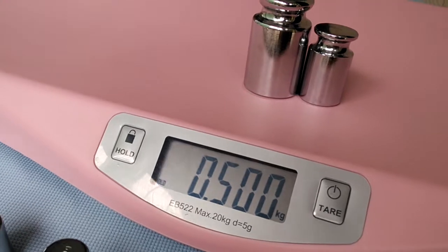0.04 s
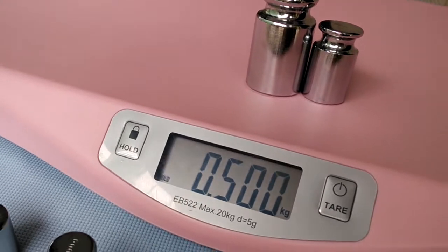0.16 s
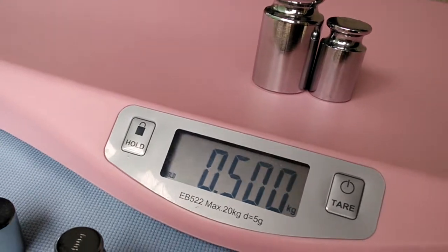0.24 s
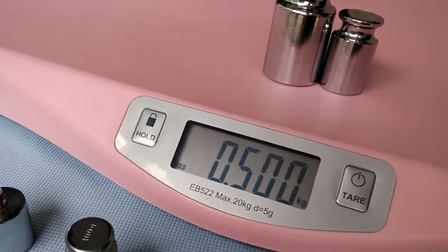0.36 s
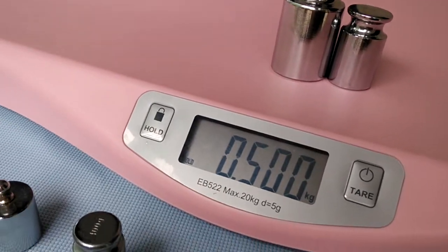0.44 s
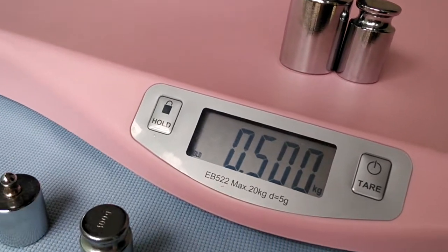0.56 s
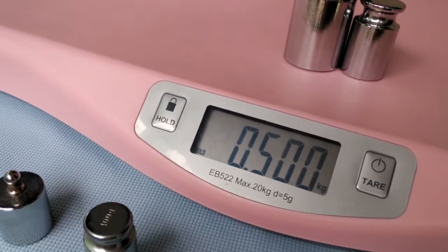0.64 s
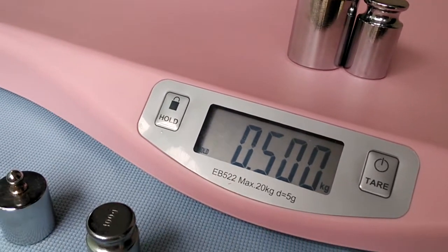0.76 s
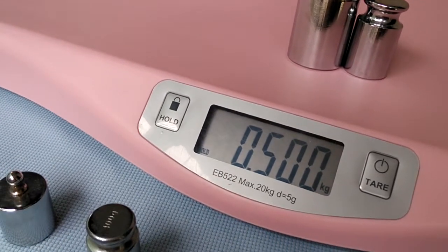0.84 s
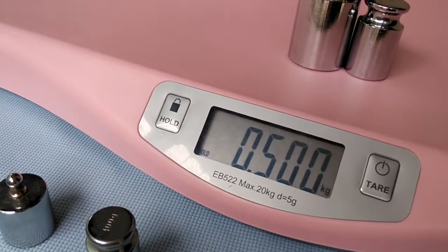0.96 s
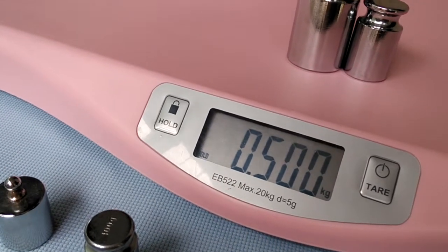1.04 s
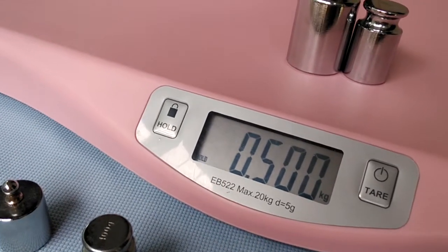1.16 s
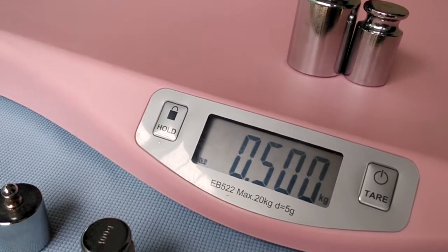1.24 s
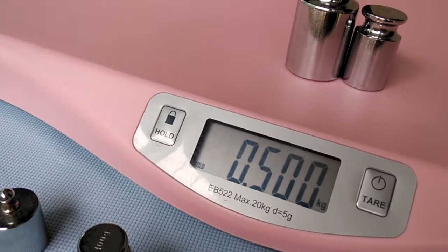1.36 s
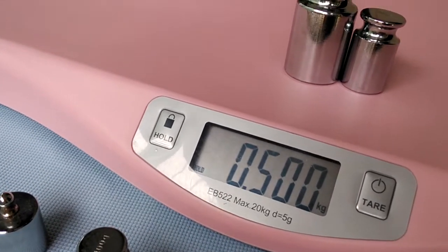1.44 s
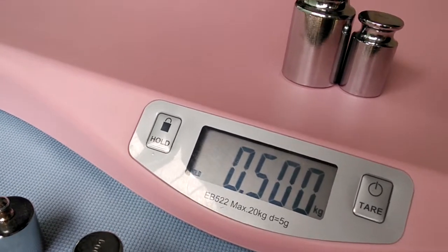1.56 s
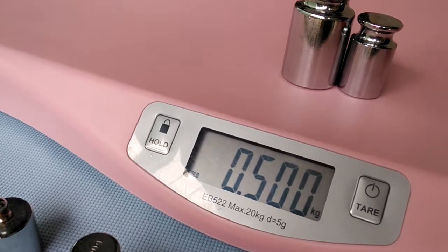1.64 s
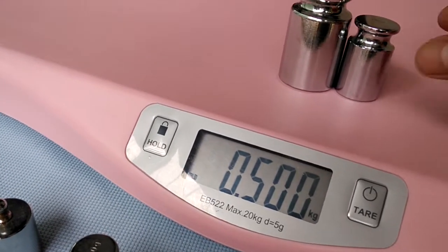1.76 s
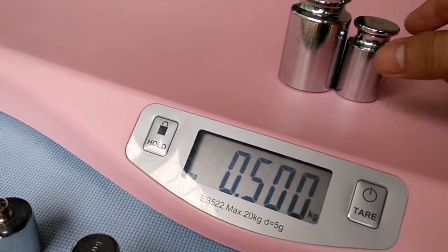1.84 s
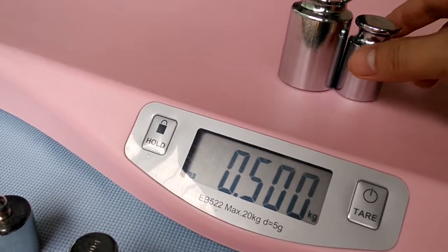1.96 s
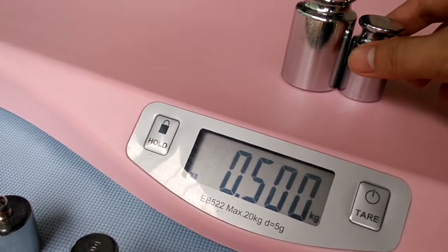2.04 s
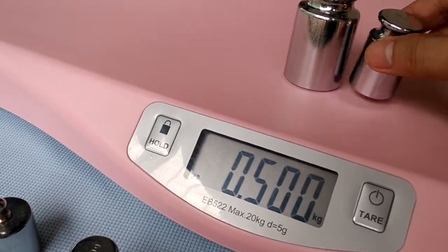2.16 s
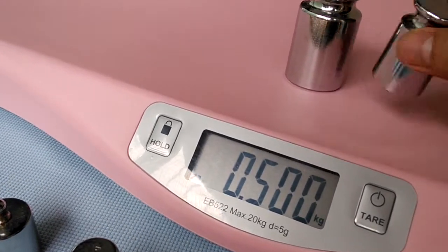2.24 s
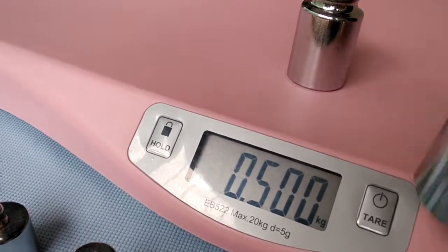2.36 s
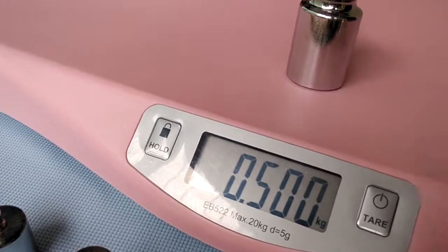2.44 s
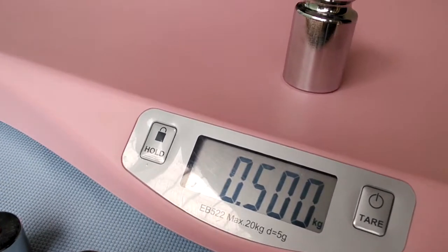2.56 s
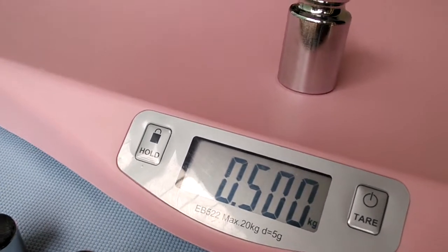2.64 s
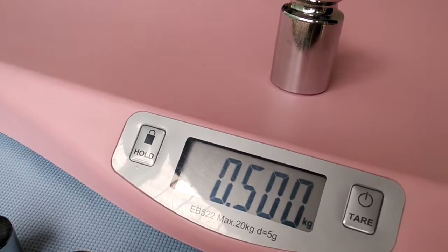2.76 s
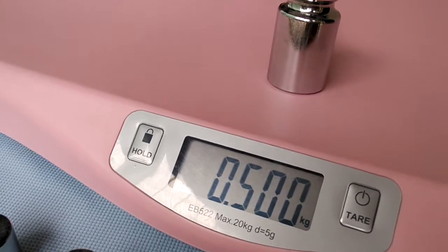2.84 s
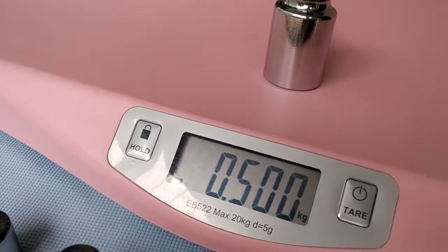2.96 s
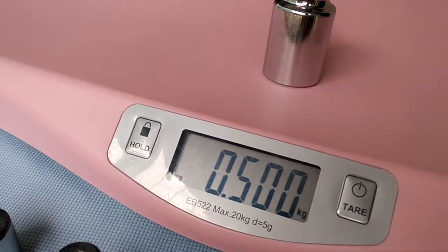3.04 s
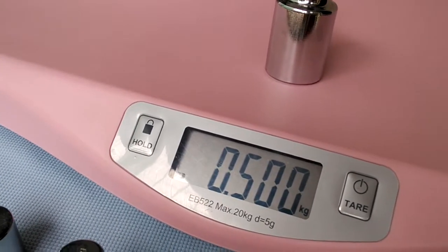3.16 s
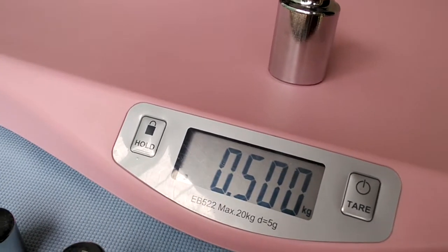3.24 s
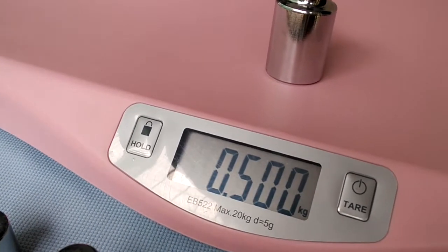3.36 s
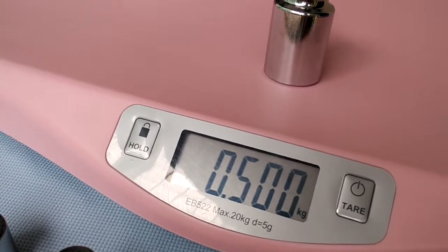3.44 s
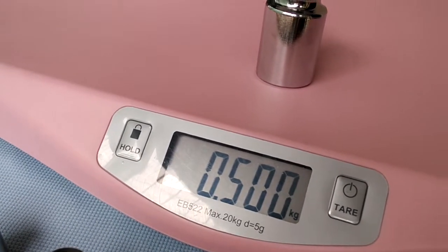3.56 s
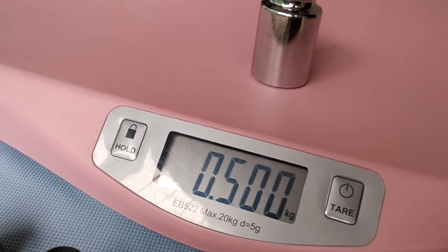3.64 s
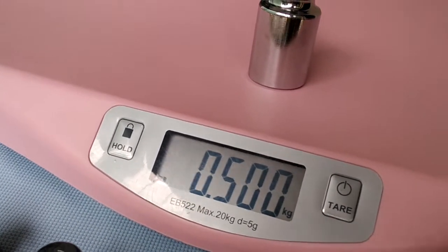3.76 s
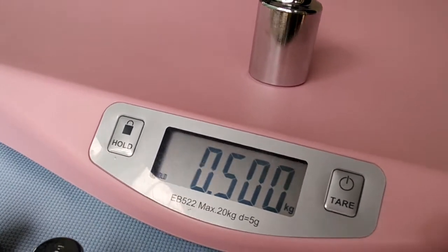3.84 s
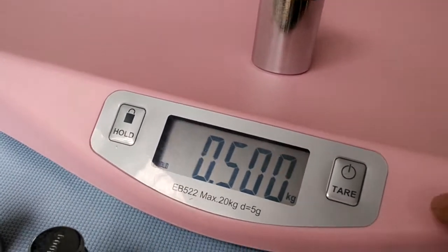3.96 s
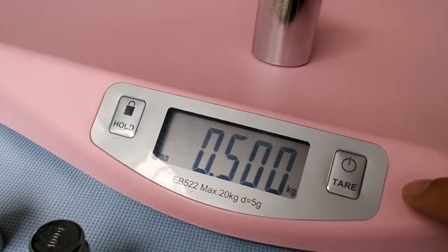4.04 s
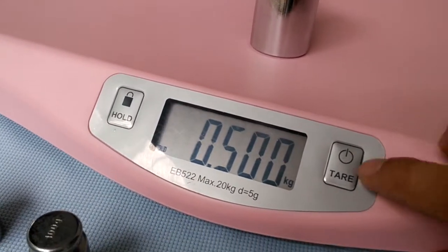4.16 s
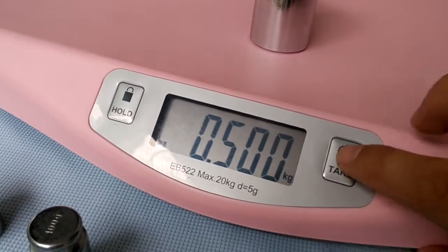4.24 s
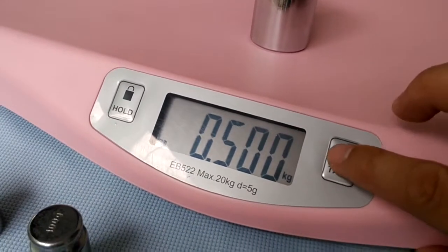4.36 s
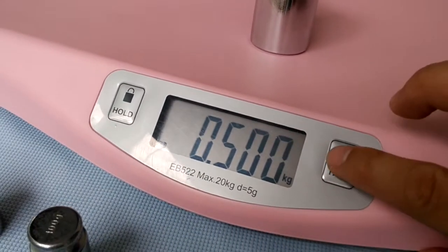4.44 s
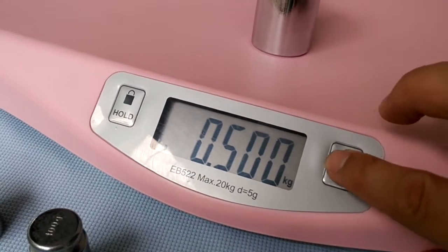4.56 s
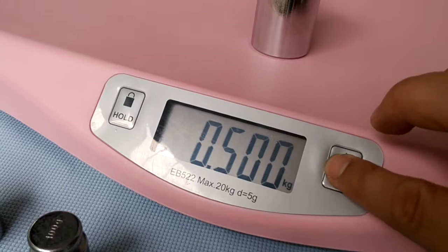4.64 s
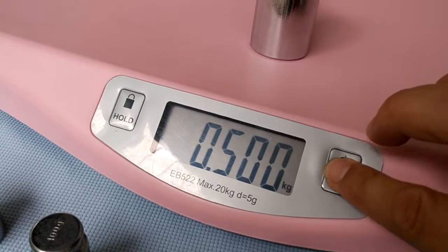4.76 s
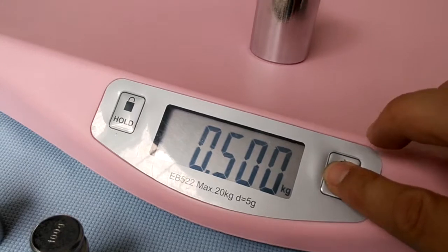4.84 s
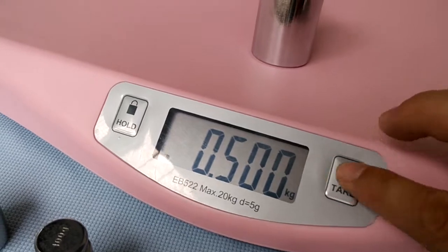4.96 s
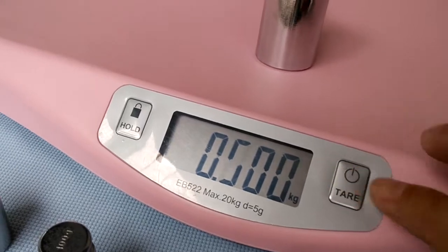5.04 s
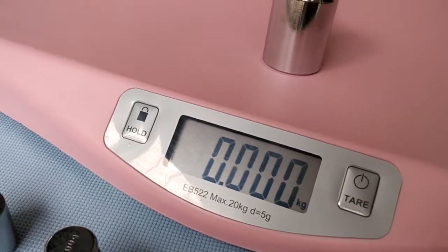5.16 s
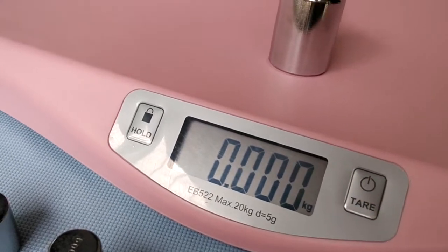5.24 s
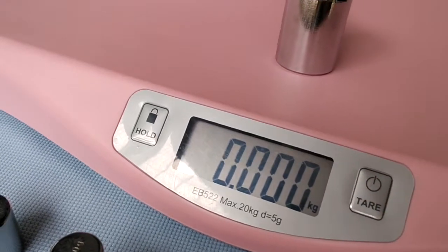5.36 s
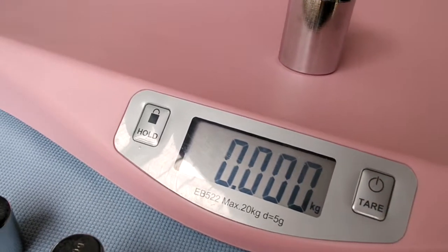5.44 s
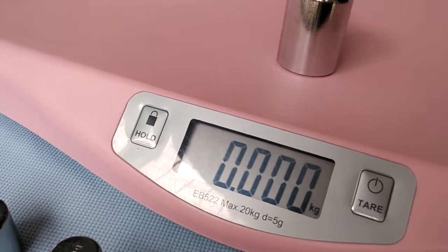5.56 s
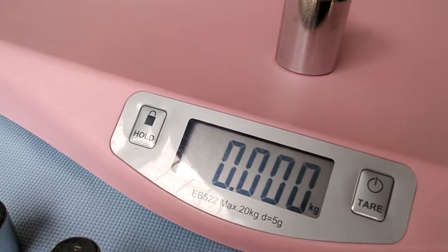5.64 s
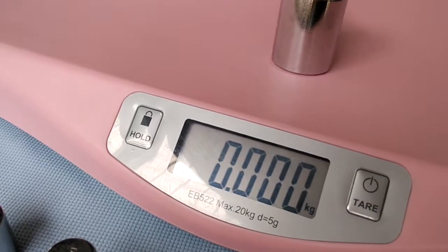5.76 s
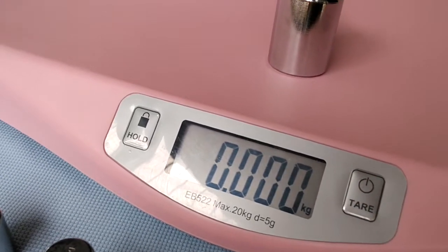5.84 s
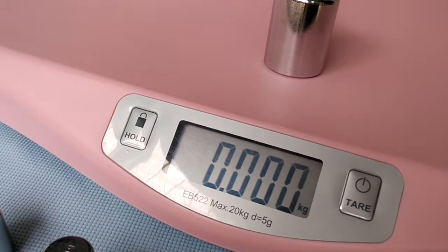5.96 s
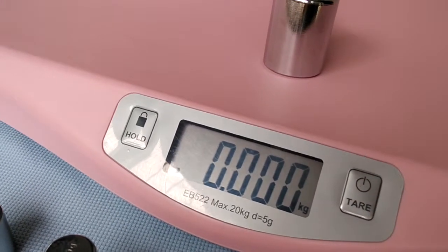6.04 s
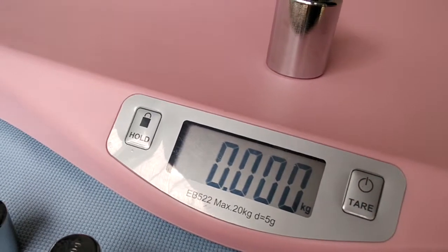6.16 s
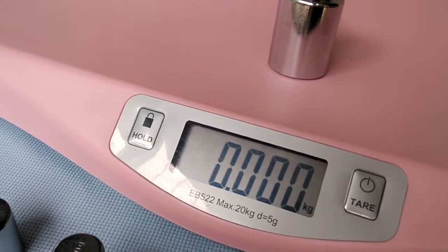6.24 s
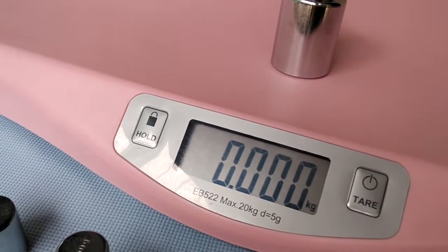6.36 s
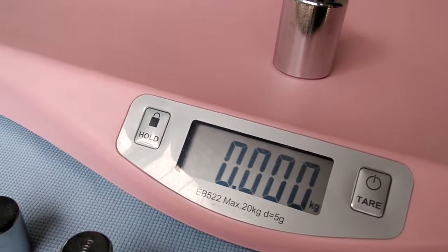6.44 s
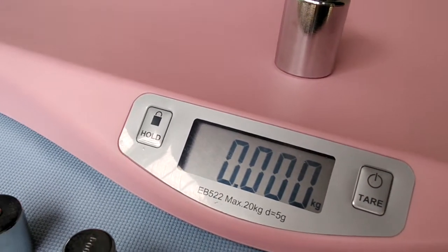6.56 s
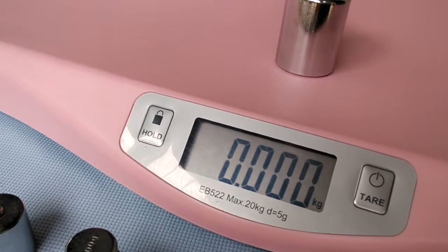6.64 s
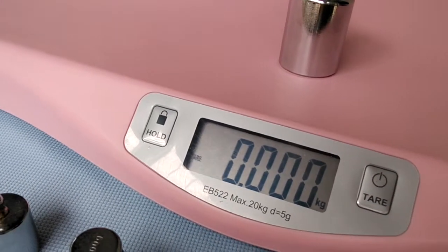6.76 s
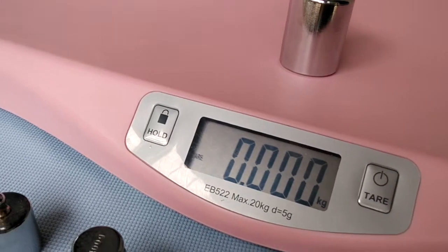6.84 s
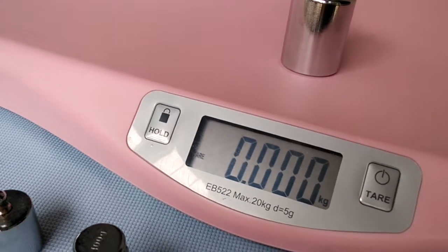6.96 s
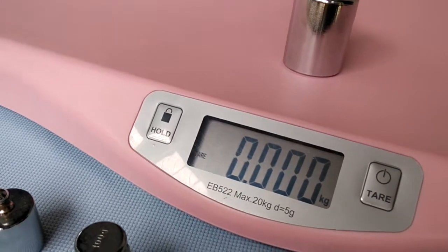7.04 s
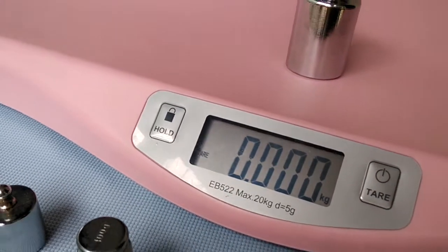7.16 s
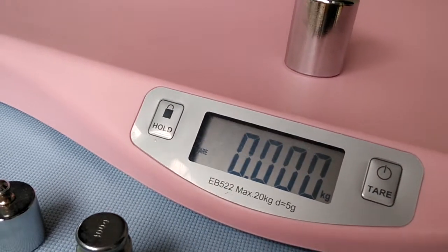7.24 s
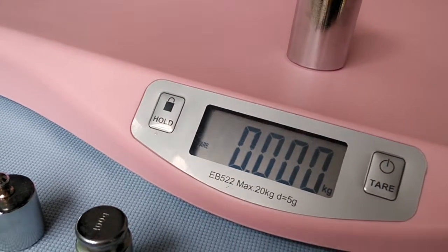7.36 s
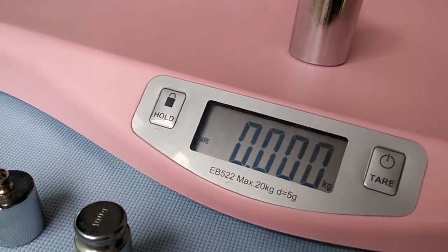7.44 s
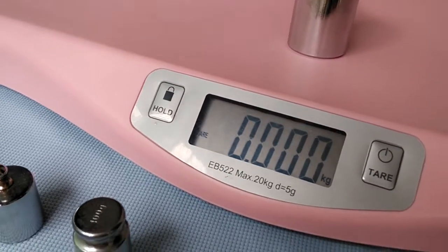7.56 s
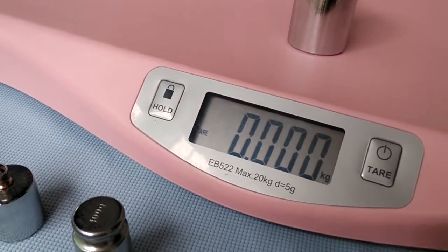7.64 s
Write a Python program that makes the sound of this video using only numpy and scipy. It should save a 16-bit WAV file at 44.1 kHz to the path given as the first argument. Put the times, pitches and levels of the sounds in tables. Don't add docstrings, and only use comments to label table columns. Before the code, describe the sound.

A faint weight lift and dull table knock, then a sharp plastic button click and softer release, over quiet birdsong and distant traffic.

```python
import sys
import numpy as np
from scipy import signal
from scipy.fft import irfft
from scipy.io import wavfile
from scipy.ndimage import uniform_filter1d

SR = 44100
rng = np.random.default_rng(int(sys.argv[2]) if len(sys.argv) > 2 else 0)


def waveform_to_disk(signal):
    frames = np.transpose(np.atleast_2d(signal))
    scaled = np.clip(frames, -1, 1) * 32767
    samples = np.round(scaled).astype(np.int16)
    wavfile.write(sys.argv[1], SR, samples)


def field_ratio(decibels):
    return 10 ** (np.asarray(decibels, dtype=float) / 20)


N = 339173


def evened(x):
    return x / np.sqrt(np.mean(x ** 2) + 1e-20)


def read(points, hz):
    f, value = np.transpose(points)
    return np.interp(np.log(hz + 1), np.log(f + 1), value)


def columns(rows, t):
    s, *values = np.transpose(rows)
    return [np.interp(t, s, v) for v in values]


def add(mix, s, sound):
    at = round(s * SR)
    part = mix[max(at, 0):][:len(sound) + min(at, 0)]
    part += sound[max(-at, 0):][:len(part)]


def resonate(x, hz, width_hz):
    turn = np.exp(2j * np.pi * np.cumsum(hz * np.ones(len(x))) / SR)
    r = np.exp(-np.pi * width_hz / SR)
    return 2 * (turn * signal.lfilter([1 - r], [1, -r], x / turn)).real


def ring(modes, contact_s):
    t = np.arange(SR // 3) / SR
    bell = sum(field_ratio(db - 60 * t / t60) * np.sin(2 * np.pi * hz * t) for hz, db, t60 in modes)
    push = np.sin(np.pi * np.clip(t[:400] / contact_s, 0, 1))
    out = np.convolve(bell, push)
    return out / abs(out).max()


def tail(decays, gap_s):
    hz, t, z = signal.stft(rng.standard_normal(SR), SR, nperseg=128)
    out = signal.istft(z * field_ratio(-60 * t / read(decays, hz)[:, None]), SR, nperseg=128)[1][:SR]
    out = np.concatenate([np.zeros(round(gap_s * SR)), out])
    return out / np.linalg.norm(out)


def coloured(points, size):
    gain = field_ratio(read(points, np.fft.rfftfreq(size, 1 / SR)))
    out = np.roll(irfft(gain), size // 2) * np.hanning(size)
    return out / np.linalg.norm(out)


def wash(points, size, patchy_db, flicker_db):
    frames, hz = 4 * N // size + 5, np.fft.rfftfreq(size, 1 / SR)
    a, b, patches = rng.standard_normal((frames, len(hz), 3)).T
    patches = evened(uniform_filter1d(uniform_filter1d(patches, 20, axis=0), 6, axis=1))
    flicker = evened(uniform_filter1d(rng.standard_normal(frames), 3))
    level_db = read(points, hz)[:, None] + patchy_db * patches + flicker_db * flicker
    z = (a + 1j * b) * field_ratio(level_db)
    return evened(signal.istft(z, nperseg=size, noverlap=3 * size // 4)[1][:N])


# (closest time [s], distance over speed [s], rumble level [dB], tyre hiss level [dB])
PASSES = [(.05, 0.16, -61.5, -81), (2.5, 0.28, -59, -100), (3.25, 0.25, -73.5, -89), (3.9, .3, -60, -80),
          (4.75, 0.37, -66, -80), (5.95, 0.07, -62, -95), (6.3, 0.57, -63.5, -74)]


def traffic(steady_db, axis):
    t = np.arange(N) / SR
    power = field_ratio(steady_db) ** 2
    for row in PASSES:
        power = power + field_ratio(row[axis]) ** 2 / (1 + ((t - row[0]) / row[1]) ** 2)
    return np.sqrt(power)


# (frequency [Hz], density [dB per Hz])
STREET = [(8.8, -31.5), (15, -10), (32, 0), (49, -2), (97, -16.5), (157, -10.5), (198, -20), (231, -16.5),
          (327, -19.5), (421, -21.5), (463, -24.5), (561, -22.5), (618, -27.5), (750, -28), (1500, -46),
          (1950, -60), (3300, -120)]


def rumble():
    return field_ratio(2.5) * traffic(-58.5, axis=2) * wash(STREET, size=4096, patchy_db=1.33, flicker_db=1.17)


def tyres():
    hiss = resonate(resonate(rng.standard_normal(N), 2250, 780), 2300, 900)
    return field_ratio(-2.0) * traffic(-87, axis=3) * evened(hiss)


# (frequency [Hz], density [dB per Hz])
AIR = [(530, -33), (900, -0.5), (1410, -8), (2490, -13.5), (3130, -14.5), (4280, -16), (4580, -16),
       (6190, -16.5), (8950, -5.5), (9700, -5), (10900, -4), (12500, -15), (14200, -9)]
# (time [s], rise [dB])
GUSTS = [(0, 1.5), (1.3, 1.5), (2.6, 2), (3.5, 0), (4.6, 1.5), (6.1, 0.5), (7.05, 0), (7.65, 0.5)]


def air():
    t, gust_s = np.arange(N) / SR, 0.19
    gust_db = sum(db * np.exp(-((t - s) / gust_s) ** 2) for s, db in GUSTS)
    return field_ratio(-70 + gust_db + 4.0) * wash(AIR, size=1024, patchy_db=2.0, flicker_db=1.0)


def whine():
    hz, level_db = 9586, -77
    return field_ratio(level_db) * evened(resonate(resonate(rng.standard_normal(N), hz, 200), hz, 280))


# (middle [s], length [s], frequency [Hz], level [dB])
METAL = [(.07, .08, 3308, -79), (.22, .15, 3308, -76), (.335, .1, 3308, -79), (.45, .12, 3308, -80),
         (.57, .07, 3308, -85), (.68, .14, 3308, -87), (.9, .18, 3308, -87), (.06, .12, 2945, -77),
         (.14, .06, 2945, -79), (.21, .13, 2945, -77), (.34, .06, 2945, -82), (.55, .4, 2945, -88),
         (.19, .26, 697, -75)]


def metal():
    out, wander_hz = np.zeros(N), 18
    t = np.arange(N) / SR
    wander = np.cumsum(wander_hz * evened(resonate(rng.standard_normal(N), 25, 30))) / SR
    t, wander = t[:2 * SR], wander[:2 * SR]
    for s, length, hz, db in METAL:
        swell = np.cos(np.pi * np.clip((t - s) / length, -.5, .5))
        add(out, 0, np.sqrt(2) * field_ratio(db) * swell * np.sin(2 * np.pi * (hz * t + wander)))
    return out


def insect():
    t = np.arange(N) / SR
    base_hz, climb_hz, climb_s = 4540, 100, 0.87
    base_db, near_db, near_s, fade_db_per_s, pulse_db = -84.5, 5.5, 0.86, 4, 3
    hz = base_hz + climb_hz * np.tanh((t / climb_s) ** 2)
    db = base_db + near_db * np.exp(-(t / near_s) ** 2) - fade_db_per_s * t
    db += pulse_db * evened(resonate(rng.standard_normal(N), 6.5, 6))
    return field_ratio(db) * evened(resonate(resonate(rng.standard_normal(N), hz, 120), hz, 200))


def whistles(calls, lower_db, trill_hz, depth, fade_db, yard_db, yard_t60, hoarse_hz):
    out = np.zeros(N + SR)
    wobble = evened(uniform_filter1d(rng.standard_normal(N + SR), 900))
    for rows in calls:
        t = np.arange(rows[0][0], rows[-1][0], 1 / SR)
        hz, db = columns(rows, t)
        hoarse = evened(uniform_filter1d(rng.standard_normal(SR), 200))[:len(t)]
        shake = wobble[round(t[0] * SR) + SR:][:len(t)]
        trill = np.cumsum(trill_hz * (1 + .25 * shake)) / SR
        dip = abs(np.sin(np.pi * trill)) ** 7
        dip = dip * rng.uniform(.35, 1, 99)[trill.astype(int) % 99]
        sung_hz = uniform_filter1d(hz - depth * (hz - hz.min()) * dip + hoarse_hz * hoarse, 60)
        tone = field_ratio(-fade_db * dip) * np.sin(2 * np.pi * np.cumsum(sung_hz) / SR)
        tone += field_ratio(lower_db + 2.7 * shake) * np.sin(np.pi * np.cumsum(hz) / SR)
        add(out, t[0] + 1, np.sqrt(2) * field_ratio(db) * tone * signal.windows.tukey(len(t), .1))
    yard = tail([(3000, yard_t60), (9000, 2.05 * yard_t60)], .004)
    return (field_ratio(-yard_db) * out + signal.fftconvolve(out, yard)[:len(out)])[SR:]


# (start [s], length [s], pitch [Hz], level [dB])
NOTES = [(-.12, .07, 6900, -65), (-.05, 0.13, 7700, -57.5), (0.103, 0.048, 8040, -59.5),
         (1.165, 0.032, 6500, -69.5), (1.2, 0.049, 7200, -66.5), (1.251, 0.047, 7740, -61.5),
         (1.303, 0.085, 7750, -60), (1.39, 0.098, 7590, -65), (1.498, 0.08, 7450, -66.5),
         (3.453, .05, 7130, -67.5), (3.494, 0.18, 7600, -63.5), (3.582, .07, 6560, -75),
         (3.66, 0.18, 7990, -62.5), (4.287, 0.039, 6260, -72), (4.326, .115, 7030, -64.5),
         (4.45, 0.12, 7680, -63), (4.565, 0.16, 8200, -68), (7.313, 0.094, 6720, -69),
         (7.4, 0.16, 7620, -64), (7.5, .19, 8050, -66)]


def ladder_bird():
    scoop_hz, scoop_s, scoop_db = 6150, .005, -10
    drift_hz, sag_db_per_s = 55, 32
    calls = [[(s, min(scoop_hz, hz), db + scoop_db),
              (s + scoop_s, hz - drift_hz, db),
              (s + length, hz + drift_hz, db - sag_db_per_s * length)] for s, length, hz, db in NOTES]
    return whistles(calls, lower_db=-25.5, trill_hz=40, depth=.95, fade_db=14,
                    yard_db=1, yard_t60=0.45, hoarse_hz=80)


# (time after start [s], pitch [Hz], relative level [dB])
SWOOP = [(0, 7350, 1), (.02, 6510, -4.5), (.052, 4610, -13), (.088, 4820, -13), (.127, 5640, -5),
         (.168, 5040, -14), (.208, 4370, -8.5), (.238, 4245, -34)]
# (start [s], level [dB])
SWOOPS = [(2.45, -52.5), (6.125, -51.5)]


def swooping_bird():
    calls = [np.add(SWOOP, (s, 0, db)) for s, db in SWOOPS]
    return whistles(calls, lower_db=-46, trill_hz=45, depth=0.33, fade_db=7,
                    yard_db=6.7, yard_t60=0.48, hoarse_hz=80)


def glides(rows):
    u, swell_db = np.linspace(0, 1, num=8), 9.5
    calls = []
    for s, length, from_hz, to_hz, db in rows:
        hz = from_hz + (to_hz - from_hz) * np.sin(np.pi * u / 2)
        calls.append(np.transpose([s + length * u, hz, db - swell_db * (1 - u) ** 2]))
    return calls


# (start [s], length
# [s], from [Hz], to [Hz], level [dB])
GLIDES = [(3.47, .1, 3600, 3800, -86), (3.993, .175, 5340, 6740, -80.5), (4.24, .07, 6600, 6000, -83),
          (4.28, 0.067, 8100, 8450, -76), (4.34, .06, 8450, 8050, -81)]
# (start [s], length [s], from [Hz], to [Hz], level [dB])
STUTTER = [(7.31, .06, 4850, 5000, -80), (7.36, 0.065, 5100, 5220, -74), (7.42, 0.081, 5350, 5650, -75)]


def far_birds():
    thin = whistles(glides(GLIDES), lower_db=-46, trill_hz=40, depth=.04, fade_db=4.3,
                    yard_db=-2.0, yard_t60=.25, hoarse_hz=20)
    broken = whistles(glides(STUTTER), lower_db=-48, trill_hz=60, depth=.5, fade_db=12,
                      yard_db=8, yard_t60=.2, hoarse_hz=170)
    return thin + broken


# (frequency [Hz], t60 [s])
ROOM = [(250, 0.26), (660, 0.19), (1740, 0.11), (4590, 0.14), (12100, 0.17)]


def room(gap_s):
    return tail(ROOM, gap_s)


# (time [s], level [dB], contact [s])
KNOCKS = [
    (2.679, -25, 0.0027),
    (2.6895, -28, 0.0027),
    (2.6941, -32, 0.00062),
]
# (frequency [Hz], level [dB], t60 [s])
TABLE = [(110, -10, 0.019), (151, 0, 0.065), (239.7, -6, 0.26), (312, -17, 0.3), (363, -7.5, 0.11),
         (412, -3.5, 0.15), (570, -6.5, 0.06), (620, -21, 0.17), (750, -24, .1), (894, -21, 0.15),
         (1120, -25, 0.21)]
# (time [s], level [dB], contact [s])
LIFTS = [
    (2.1005, -44, 0.00092),
    (2.106, -51.5, 0.0012),
    (4.631, -54, 0.0013),
]
# (frequency [Hz], level [dB], t60 [s])
SHELL = [(422, -34, .12), (588, 3, 0.13), (807, 10.5, 0.055), (1026, 8.5, 0.057), (1500, -28.5, .05),
         (2300, -16, .04), (3300, -20, .03)]
# (time [s], level [dB], centre [Hz], width [Hz], t60 [s])
SCUFFS = [(2.094, -43, 2500, 3000, 0.025), (2.32, -39, 1980, 3000, .2), (2.68, -25, 650, 500, .1),
          (2.692, -36, 2500, 3000, .3), (2.701, -28.5, 9900, 4980, 0.33), (4.628, -31, 695, 900, .15),
          (4.666, -19, 150, 100, .3)]


def weight():
    out = np.zeros(N)
    no_bass = signal.butter(2, 85, "high", fs=SR)
    for s, db, contact_s in KNOCKS:
        add(out, s, -field_ratio(db) * signal.lfilter(*no_bass, ring(TABLE, contact_s)))
    for s, db, contact_s in LIFTS:
        add(out, s, field_ratio(db) * ring(SHELL, contact_s))
    for s, db, hz, width_hz, t60 in SCUFFS:
        add(out, s, field_ratio(db) * resonate(resonate(tail([(hz, t60)], 0), hz, width_hz), hz, width_hz))
    answer = signal.fftconvolve(out, room(.00417))[:N]
    return out + field_ratio(-1.5) * signal.lfilter(*signal.butter(3, 130, "high", fs=SR), answer)


# (time [s], peak [dB],
# frequency [Hz])
TICKS = [(1.6284, -58, 9580), (1.907, -67, 9590), (2.689, -48, 8720), (3.4146, -48, 10500),
         (4.599, -44.5, 8300), (5.0275, -42, 8700), (5.2179, -49, 9050), (5.4889, -54, 9570),
         (5.9477, -50, 9000)]


def ticks():
    out, kick = np.zeros(N), signal.unit_impulse(600)
    for s, db, hz in TICKS:
        tick = resonate(resonate(kick, hz, 2500), hz, 4000)
        tick = field_ratio(db) * tick / abs(tick).max()
        answer = signal.unit_impulse(SR // 4) + field_ratio(4.5) * room(.00059)[:SR // 4]
        add(out, s + .001, signal.fftconvolve(tick, answer))
    return out


# (time [s], peak [dB], room level [dB], tray level [dB], damping factor [1])
SNAPS = [
    (4.65262, -1.7, -9, -30.5, .8),
    (4.97975, -15.6, -7.5, -16.5, .5),
]
# (frequency [Hz], width [Hz], level [dB])
DOME_DOWN = [(3000, 1100, -30), (4700, 640, -17), (5850, 1500, -15), (8200, 2200, 3), (10860, 1500, -1),
             (12250, 560, -2), (13700, 500, -6.5)]
# (frequency [Hz], width [Hz], level [dB])
DOME_UP = [(3000, 240, -8.5), (4360, 300, -6.5), (6130, 820, -10), (6900, 220, -3.5), (8050, 1500, 0),
           (9130, 580, -11), (9540, 810, -9), (10700, 1000, -23), (11800, 800, -18), (13800, 900, -31)]
# (delay [s], level [dB])
ECHOES = [(.0019, -15), (.0036, -18), (.0101, -19), (.0109, -20), (.0155, -27), (.018, -26), (.021, -25),
          (.027, -30)]
# (frequency [Hz], level [dB], t60 [s])
TRAY_MODES = [(428, -15, 0.041), (530, -39, 0.034), (955, -24.5, 0.068), (3200, 1, 0.043),
              (3670, 17, 0.051)]
# (frequency [Hz], density [dB per Hz])
TRAY = [(59, -51), (100, 2), (285, -20), (451, -5), (701, -13), (957, -9), (2030, -11.5), (2870, -7.5),
        (3720, -15), (5000, -18), (6500, -22), (11000, -120)]


def button():
    out, kick = np.zeros(N), signal.unit_impulse(600)
    echoes = signal.unit_impulse(SR // 20)
    for delay_s, db in ECHOES:
        add(echoes, delay_s, field_ratio(db) * rng.standard_normal(30) / 5)
    for (s, db, room_db, tray_db, damping), dome in zip(SNAPS, (DOME_DOWN, DOME_UP)):
        snap = np.zeros(len(kick))
        for k, (hz, width_hz, mode_db) in enumerate(dome):
            mode = resonate(resonate(kick, hz, damping * (width_hz + 300)), hz, damping * 2400)
            snap += (-1) ** k * field_ratio(mode_db) * mode
        snap = field_ratio(db) * snap / abs(snap).max()
        add(out, s, signal.fftconvolve(snap, echoes))
        add(out, s, field_ratio(room_db - 2.5) * signal.fftconvolve(snap, room(.001)))
        add(out, s, field_ratio(db + tray_db - 17) * ring(TRAY_MODES, .00012))
        dense = signal.fftconvolve(coloured(TRAY, size=1024), room(0))[512:]
        add(out, s, field_ratio(db + tray_db + 21) * dense)
    return out


def scene():
    outdoors = rumble() + tyres() + air() + whine() + metal() + insect()
    flock = ladder_bird() + swooping_bird() + far_birds()
    indoors = weight() + ticks() + button()
    return np.tile(outdoors + flock + indoors, (2, 1))


def low_pass(x):
    return signal.sosfilt(signal.butter(12, 14330, fs=SR, output="sos"), x)


# (frequency [Hz], side against mid [dB])
SIDE_DB = [(60, -69), (110, -78.5), (200, -64.5), (370, -56), (690, -57), (1270, -44.5), (2340, -36),
           (4300, -15), (7920, -6.5), (14600, -2.5)]


def record(dry):
    hz, t, z = signal.stft(dry[0], SR, nperseg=256)
    ceiling = 1.8 * np.median(abs(z), axis=1)[:, None]
    size = np.minimum(abs(z), ceiling) + field_ratio(-28) * abs(z)
    phase = 2 * np.pi * rng.random(z.shape[::-1]).T
    z = size * field_ratio(read(SIDE_DB, hz))[:, None] * np.exp(1j * phase)
    side = field_ratio(1.5) * signal.istft(z, SR, nperseg=256)[1][:N]
    edge = signal.firwin(141, 14600, window=("kaiser", 7), fs=SR)
    return low_pass(signal.oaconvolve(dry + np.array([side, -side]), edge[None], "same"))


dry = scene()
out = record(dry)
waveform_to_disk(out)
```